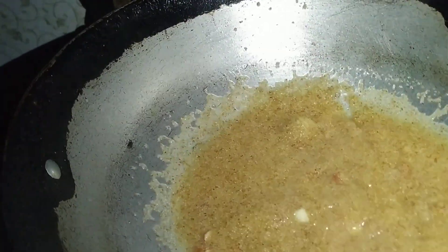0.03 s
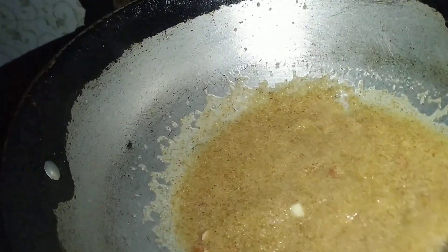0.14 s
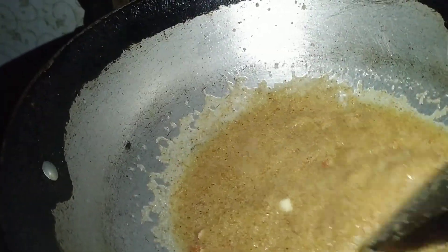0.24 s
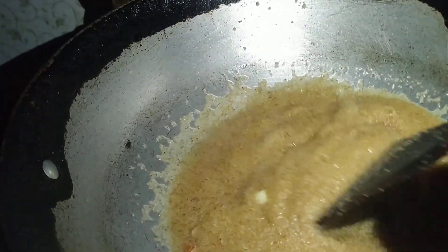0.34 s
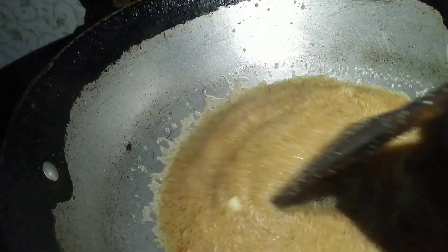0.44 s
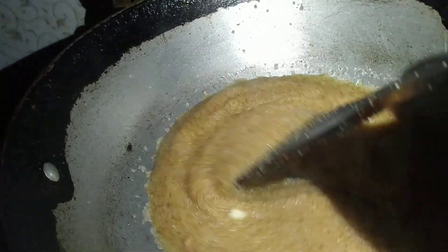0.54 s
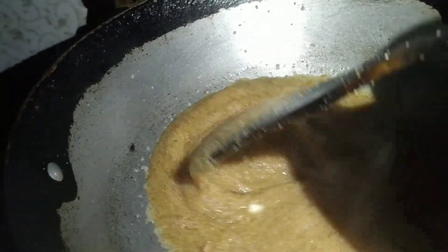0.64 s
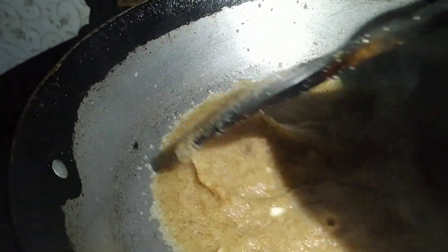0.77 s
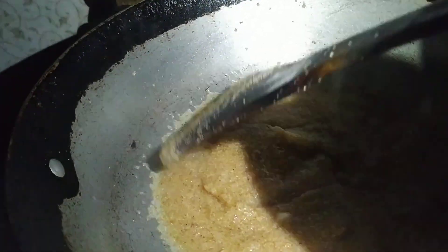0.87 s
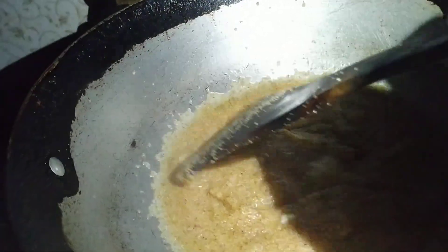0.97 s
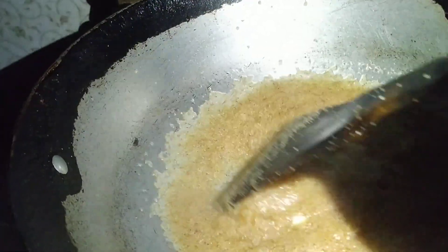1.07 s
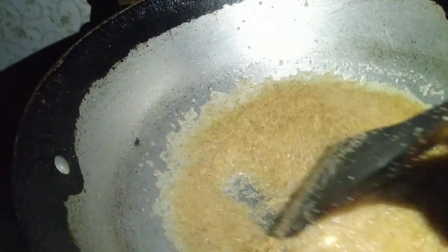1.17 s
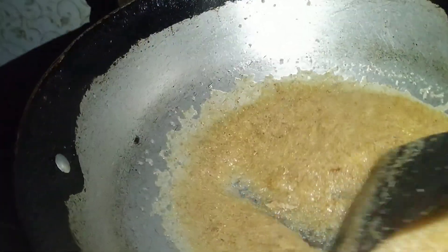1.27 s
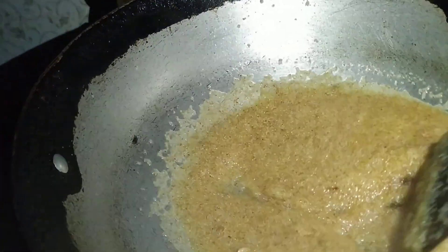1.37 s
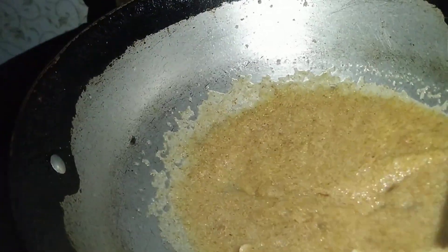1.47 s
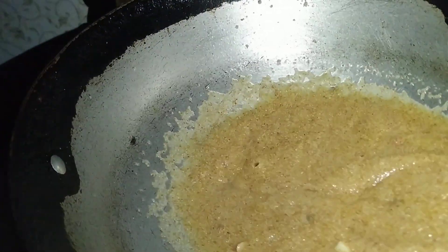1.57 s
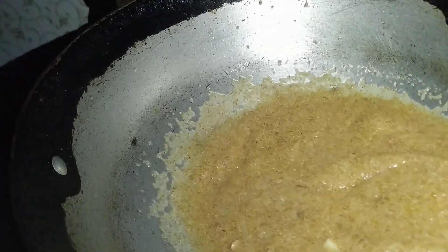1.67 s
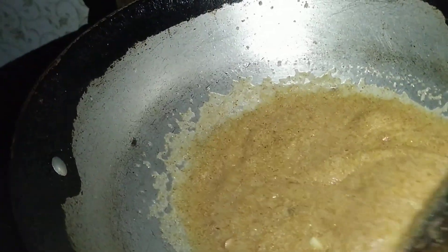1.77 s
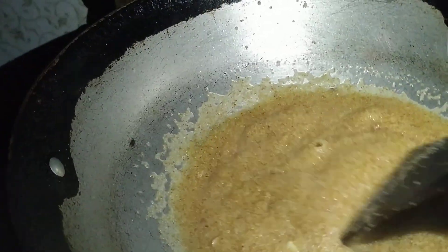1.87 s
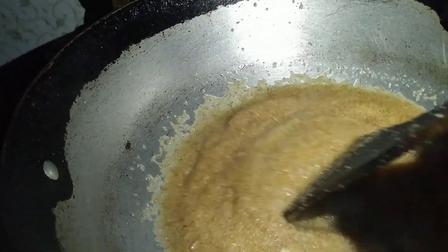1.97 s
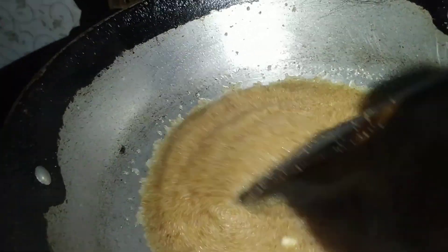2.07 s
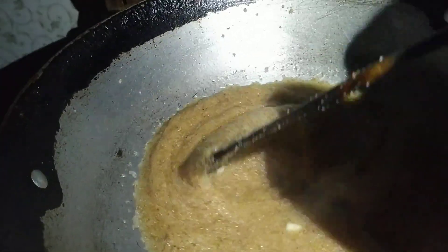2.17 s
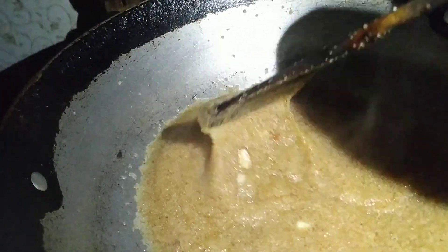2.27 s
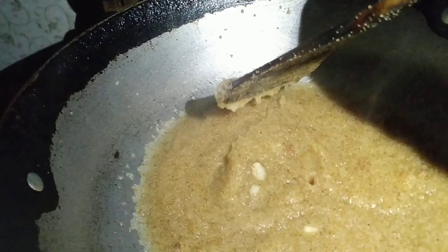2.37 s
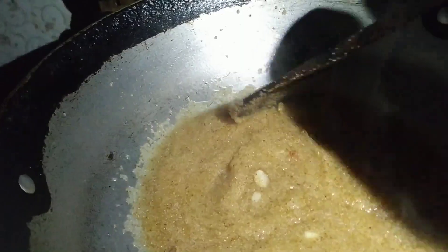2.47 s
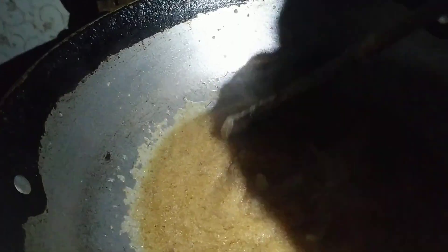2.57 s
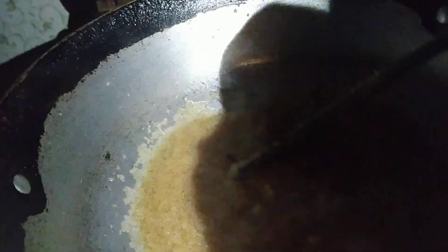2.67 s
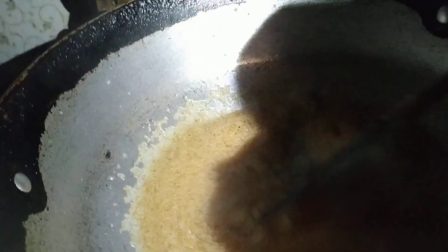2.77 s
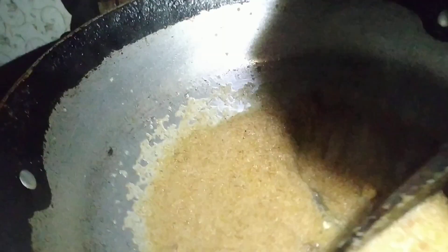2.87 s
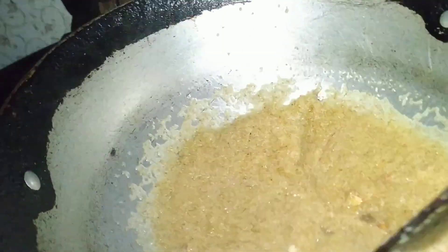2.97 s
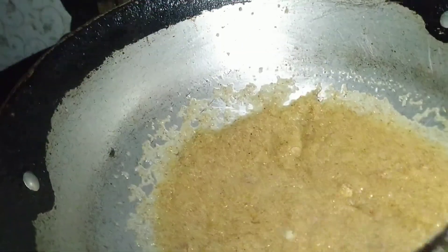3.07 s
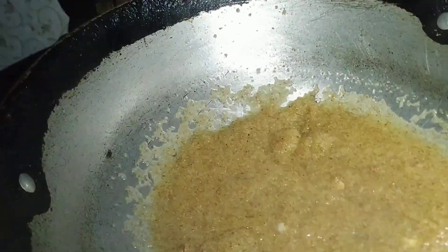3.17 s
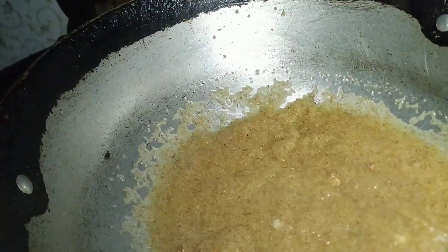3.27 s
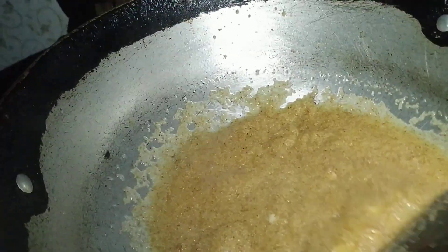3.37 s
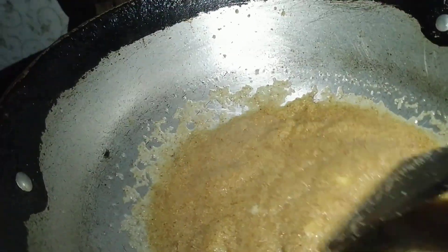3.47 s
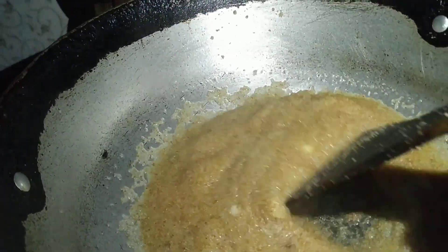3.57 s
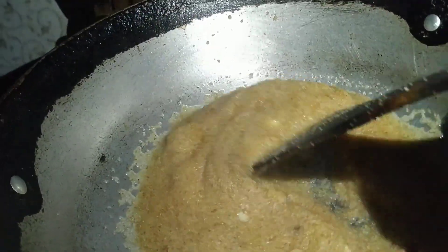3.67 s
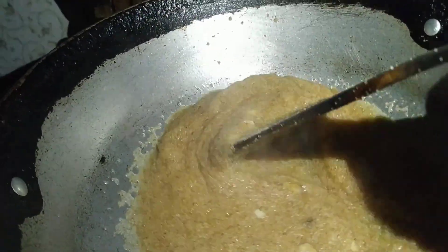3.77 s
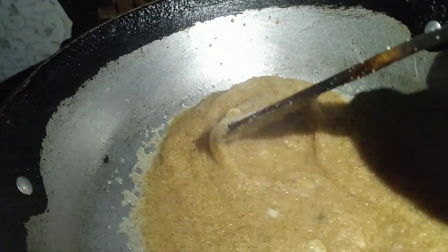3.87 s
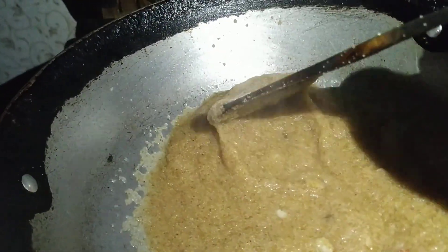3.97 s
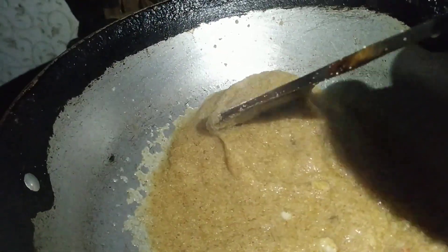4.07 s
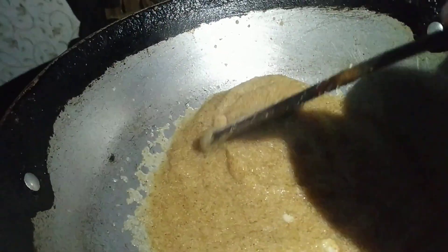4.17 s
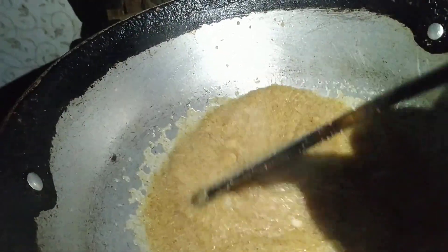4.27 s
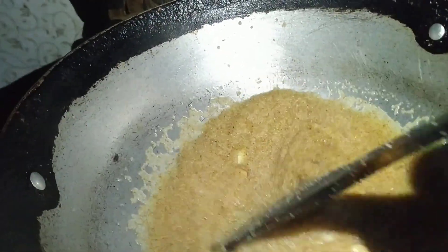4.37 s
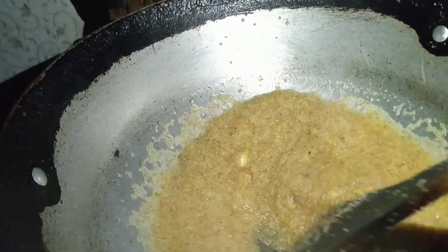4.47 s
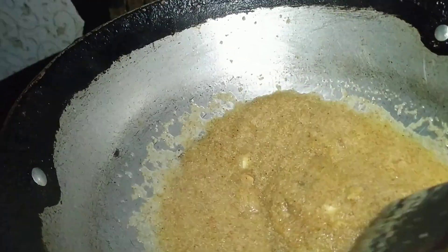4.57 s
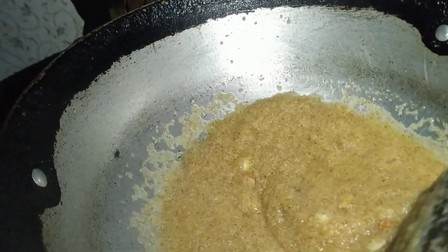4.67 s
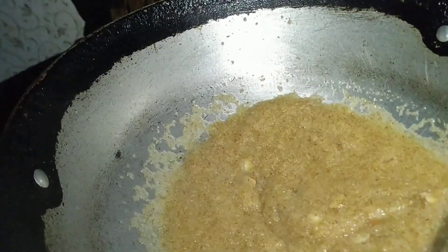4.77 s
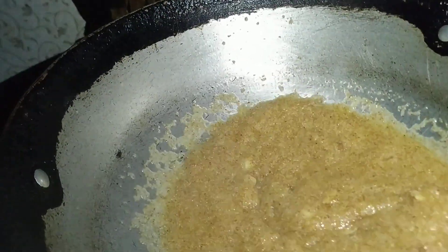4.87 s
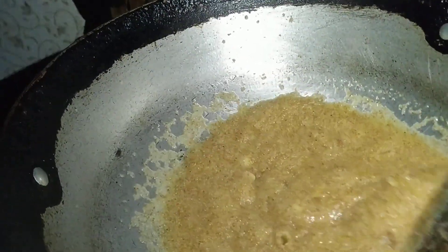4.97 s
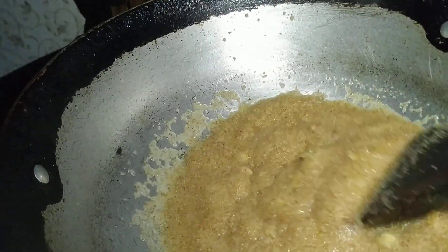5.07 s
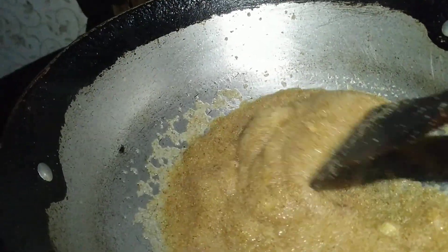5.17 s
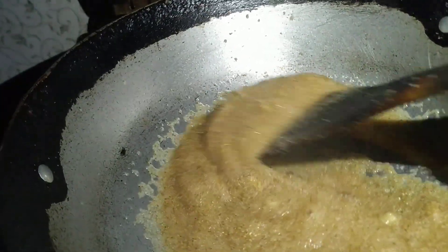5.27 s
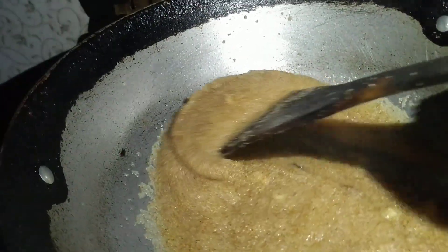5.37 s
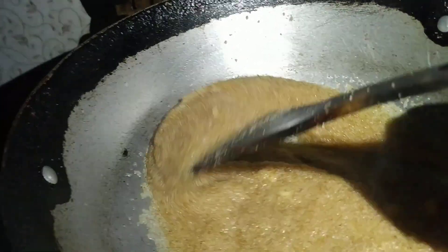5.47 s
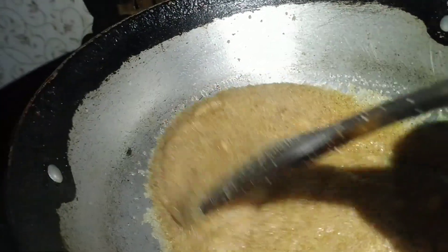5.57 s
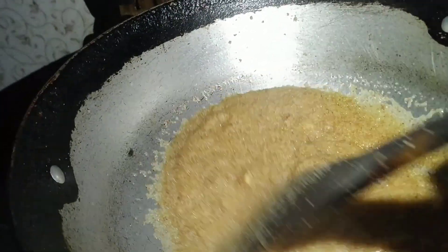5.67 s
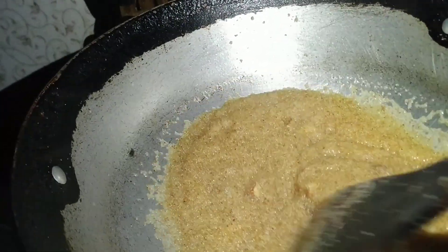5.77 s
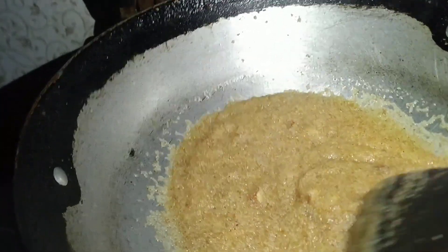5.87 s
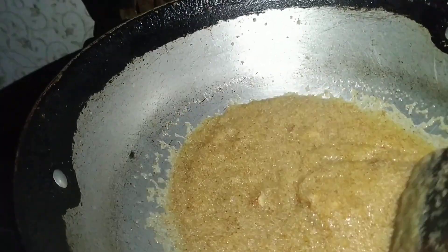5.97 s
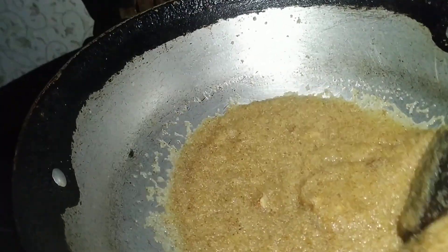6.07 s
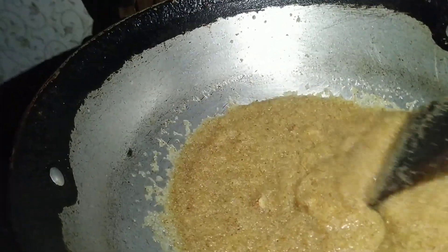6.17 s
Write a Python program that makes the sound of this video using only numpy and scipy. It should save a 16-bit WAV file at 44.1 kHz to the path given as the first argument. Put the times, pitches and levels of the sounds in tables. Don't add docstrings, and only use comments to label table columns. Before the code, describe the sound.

A metal spatula stirs thick, grainy pudding in a metal pan, landing with dull knocks and short gritty scrapes over low kitchen rumble.

```python
import sys
import numpy as np
from scipy import signal
from scipy.fft import rfft, irfft, next_fast_len
from scipy.io import wavfile
from scipy.ndimage import uniform_filter1d

SR = 44100
rng = np.random.default_rng(int(sys.argv[2]) if len(sys.argv) > 2 else 0)


def master_out(mix):
    frames = np.transpose(np.atleast_2d(mix))
    ceiling = np.clip(frames, -1, 1)
    pcm = np.round(ceiling * 32767).astype(np.int16)
    wavfile.write(sys.argv[1], SR, pcm)


def invert_db(x):
    u = np.asarray(x, float) / 20
    return 10 ** u


N = 274302
PAD = next_fast_len(N + SR // 2)
SPOTS = 7

# (frequency [Hz], correlation [0-1])
ALIKE = [(60, 0.85), (300, 0.94), (700, 0.89), (1100, 0.023), (1500, 0.0018), (15000, 0.0033)]
# (low edge [Hz], high edge [Hz])
RANGES = [
    (265, 450),
    (450, 1300),
    (1200, 2600),
    (3800, 16000),
    (480, 880),
]
# (time [s], peak [dB], hardness [dB], left-right [dB], easing just before [dB])
LANDINGS = [(0.186, -20, -39, 6, 84), (0.321, -14.5, -13.5, 2, -4), (0.629, -6.5, -16.5, 3.5, 5),
            (0.965, -26.5, -17, 15, 17), (1.073, -13, -20, 2, 19), (1.757, -15.5, -40, 2, 14),
            (1.89, -25, -6.5, 1, -7), (2.177, -3, -17.5, -1, 15), (2.564, -26, -15, 10, -5),
            (3.421, -26.5, -7, 5, 40), (3.57, -12.5, -17, 6, 28), (3.679, -22, -26, 7, 7),
            (3.811, -14, -37, 2, 29), (4.236, -35, -5, 2, -2), (5.025, -14.5, -34, 2, -3),
            (5.604, -23.5, -14, 1, -10), (6.137, -15.5, -40, -1, 17)]
# (time [s], peak [dB], hardness [dB], left-right [dB])
CHATTER = [(0.216, -15, -31, 0), (0.234, -27, -32, 13), (0.42, -20, -17.5, 4), (0.993, -7.5, -19.5, 5),
           (1.007, -8.5, -29, 6), (1.295, -29, -24, 1), (1.784, -34, -24, 5), (2.577, -22, -25, 8),
           (2.617, -13.5, -9.5, 7.5), (3.112, -37, -37, -4), (3.693, -17.5, -32, 1), (3.779, -22, -27, 5),
           (4.247, -13.5, -18, 7), (5.058, -22, -32, 11), (5.083, -16, -9.5, 0), (5.624, -17.5, -13.5, 9),
           (5.755, -20.5, -16.5, 2), (6.184, -11.5, -12.5, 1)]
# (time [s], peak [dB], hardness [dB], left-right [dB], skid [s])
NUDGES = [(0.1, -31, -21, 3, 0.0074), (0.505, -26.5, -15, 12, 0.057), (0.889, -24, -22, 11, 0.027),
          (1.668, -35, -33, 16, 0.014), (1.988, -18.5, -29, 11, 0.02), (2.074, -25.5, -16, 3, 0.061),
          (2.478, -22, -26, 5, 0.014), (2.912, -32, -38, -2, 0.019), (3.325, -30, -43, 2, 0.031),
          (4.149, -21.5, -26, 6, 0.015), (4.639, -32.5, -39, 2, 0.01), (4.944, -23.5, -25, 2, 0.022),
          (5.494, -26.5, -37, 7, 0.03), (6.034, -29, -38, -3, 0.03)]


def rms_one(x):
    return x / np.sqrt(np.mean(x ** 2) + 1e-20)


def in_time(rows):
    s, *columns = np.transpose(rows)
    return [np.interp(np.arange(N) / SR, s, c) for c in columns]


def at_hz(points, hz):
    return np.interp(np.log(hz), np.log(np.array(points)[:, 0]), np.array(points)[:, 1])


def drift(rate):
    r = np.exp(-80 * np.pi * rate / SR)
    slow = signal.lfilter([1], [1, -2 * r, r * r], rng.standard_normal(N // 40 + 4002))[4000:]
    return np.interp(np.arange(N) / 40, np.arange(len(slow)), rms_one(slow - slow.mean()))


def butter(x, order, hz, kind):
    return signal.sosfilt(signal.butter(order, hz, kind, fs=SR, output="sos"), x + 1e-18)


def band(x, low_hz, high_hz):
    return butter(x, 2, [low_hz, high_hz], "band")


def sides(pan_db):
    return invert_db(np.array([pan_db, -pan_db]) / 2)


def coloured(spectrum, balance):
    hz = np.arange(1, PAD // 2 + 2) * SR / PAD
    mid, side = rfft(rng.standard_normal((2, PAD)))
    alike = np.clip(at_hz(ALIKE, hz), 0, 1)
    pair = np.sqrt(1 + alike) * mid + np.sqrt(1 - alike) * side * [[1], [-1]]
    pair = pair * invert_db(at_hz(spectrum, hz)) * sides(at_hz(balance, hz))
    return rms_one(irfft(pair, PAD)[:, :N])


def electronics(left_db, right_db):
    # (frequency [Hz], density [dB per Hz])
    hiss_left = [(2000, -27), (7000, -14.5), (10000, -13.5), (13000, -7.5), (15500, -2.5)]
    hiss_right = [(2000, -4), (7000, -4.5), (10000, 1), (13000, 0.5), (15500, 0.5)]
    # (multiple, left [dB], right [dB])
    whine = [(63, -87, -99), (72, -84, -99), (99, -88, -99), (116, -88, -95), (125, -84, -93),
             (134, -88, -87), (143, -81, -85), (152, -86, -90), (170, -83, -88), (179, -81, -89),
             (188, -79, -94), (197, -80, -103), (206, -81, -96), (215, -88, -93), (233, -80, -92),
             (240, -84, -99), (241, -77, -95), (242, -77, -93), (250, -79, -95), (251, -73, -93),
             (256, -83, -99), (259, -81, -99), (260, -75, -99)]
    clock_hz = 59.9973
    hz = np.arange(1, PAD // 2 + 2) * SR / PAD
    shape = invert_db([at_hz(hiss_left, hz), at_hz(hiss_right, hz)])
    left, right = irfft(rfft(rng.standard_normal((2, PAD))) * shape, PAD)[:, :N]
    out = np.array([invert_db(left_db) * rms_one(left), invert_db(right_db) * rms_one(right)])
    for multiple, *db in whine:
        line = np.cos(2 * np.pi * clock_hz * multiple * np.arange(N) / SR)
        out += invert_db(np.array(db) + 3.5)[:, None] * line
    return out


def kitchen():
    # (frequency [Hz], density [dB per Hz])
    rumble = [(18, -18), (30, 19), (59, 4.5), (132, 13.5), (193, -8), (304, 5.5), (467, -5.5), (565, -52),
              (700, 3), (1030, -6.5), (1860, -14), (3380, -26), (5860, -22.5), (6600, -63), (9000, -57),
              (11700, -71), (19800, -120)]
    # (frequency [Hz], left-right [dB])
    rumble_balance = [(30, 2), (100, 1), (300, -0.5), (1200, 4), (8000, 5)]
    swell_db = 2 * drift(2.5)
    return invert_db(-52.5 + swell_db) * coloured(rumble, rumble_balance)


def lows(pressure):
    # (time [s], level [dB])
    sway_curve = [(0.0, -53), (1.84, -48), (1.92, -33), (2.03, -32), (2.11, -49), (2.25, -29), (2.32, -34),
                  (2.56, -39), (2.6, -41.5), (3.34, -56.5), (3.43, -47), (3.62, -58), (4.99, -51),
                  (5.16, -67), (5.39, -46.5), (6.22, -48)]
    rest_db, shaken_db = -53, -23
    sway = rms_one(band(band(rng.standard_normal(N + SR), 12, 24), 10, 26)[SR:])
    turns = np.cumsum(50.5 + 3.48 * drift(10.5)) / SR
    hum = np.sqrt(2) * np.sin(2 * np.pi * turns) * invert_db(4 * drift(25))
    hum_level = invert_db(rest_db) + invert_db(shaken_db) * uniform_filter1d(pressure, size=2000)
    return invert_db(in_time(sway_curve)[0]) * sway + hum_level * hum * sides(-2.4)[:, None]


def bumps(spring_hz, damping, pan_db):
    # (time [s], push [dB], push length [ms], click [dB])
    finger_bumps = [
        (2.5325, -12, 5.0, -40),
        (2.6175, -10, 2.4, -15),
        (2.6315, -16, 2.4, -29),
    ]
    push, click = np.zeros(N), np.zeros(N)
    click_fall_db = np.linspace(0, 69.0, 300)
    for s, db, ms, click_db in finger_bumps:
        i = round(s * SR)
        length = ms * SR / 1000
        n = np.arange(int(length) + 1)
        push[i:i + len(n)] -= invert_db(db) * np.sin(np.pi * n / length) ** 2
        click[i:i + 300] += invert_db(click_db - click_fall_db) * rng.standard_normal(300)
    spring = [1, 4 * np.pi * damping * spring_hz, (2 * np.pi * spring_hz) ** 2]
    b, a = signal.bilinear([1, 0, 0], spring, SR)
    return signal.lfilter(b, a, push + 1e-18) * sides(pan_db)[:, None] + band(click, 3700, 6050)


def pops(rise):
    # (time [s], peak [dB], pitch [Hz], length [cycles], left-right [dB])
    bubbles = [(.162, -46, 1300, 7.3, 3), (0.484, -31, 2440, 16, 2), (.839, -20, 1330, 7.8, 4),
               (0.852, -43, 3880, 7.7, 18), (1.525, -24.5, 1210, 5.6, -5), (1.597, -42.5, 2630, 14, -2),
               (1.741, -34, 1190, 13, 14), (2.93, -40.5, 1310, 8.3, -20), (2.941, -34, 1490, 9, -5),
               (3.396, -35, 1480, 8, 12), (4.093, -30, 1900, 5.6, 20), (4.106, -30.5, 4700, 13, 6),
               (4.811, -41, 2240, 8.2, 17), (4.929, -16.5, 1170, 8, 4.5), (4.951, -26, 3950, 6.1, 10),
               (5.335, -36.5, 2680, 5.2, 21), (5.352, -33, 2190, 5, 13), (5.375, -47, 2700, 18, 8)]
    out = np.zeros((2, N))
    for s, db, hz, cycles, pan_db in bubbles:
        turns = np.arange(600) / SR * hz
        fade = invert_db(db - 60 * turns / cycles) * np.minimum(turns, 1)
        pop = fade * np.sin(2 * np.pi * turns * (1 + rise * turns))
        for side, lag in enumerate((0, 12)):
            i = round(s * SR) + lag
            out[side, i:i + len(pop)] += sides(pan_db)[side] * pop
    return out


def damped_rings(rows, level_db, pan_db, lead):
    out, t = np.zeros((2, N + SR)), np.arange(SR // 5) / SR
    for s, db, hz, t60 in rows:
        i = round(s * SR)
        fade = invert_db(db + level_db - 60 * t / np.clip(t60, .01, .15)) * np.minimum(2 * hz * t, 1)
        out[:, i:i + len(t)] -= fade * np.sin(2 * np.pi * hz * t + [[lead], [0]])
    return out[:, :N] * sides(pan_db)[:, None]


def tinks():
    # (time [s], peak [dB], pitch [Hz], t60 [s])
    edge_tinks = [(0.189, -27, 1130, 0.03), (0.216, -32, 1200, 0.03), (0.263, -39, 1120, 0.03),
                  (0.3207, -19.5, 1115, 0.038), (0.3444, -20, 1000, 0.037), (0.4304, -39, 1110, 0.03),
                  (0.6275, -19, 1060, 0.037), (0.635, -15, 1070, 0.027), (0.6476, -13, 1120, 0.027),
                  (0.629, -21, 1720, 0.04), (0.632, -30, 1410, 0.061), (2.178, -15, 1410, 0.051),
                  (0.9693, -24, 1130, 0.03), (0.9924, -32, 990, 0.022), (1.0074, -12, 1220, 0.033),
                  (1.097, -17, 980, 0.033), (1.1147, -30, 1140, 0.026), (1.7564, -40, 1120, 0.03),
                  (1.783, -39, 1180, 0.03), (1.8914, -13.5, 1110, 0.036), (2.0742, -41, 1090, 0.03),
                  (2.1775, -28, 1010, 0.035), (2.184, -8, 1010, 0.026), (2.197, -22, 1060, 0.033),
                  (2.577, -38, 1030, 0.03), (2.5925, -25, 1330, 0.033), (2.6314, -14, 980, 0.028),
                  (2.6903, -40, 1010, 0.03), (3.4207, -26, 1100, 0.042), (3.4511, -41, 1120, 0.03),
                  (3.5708, -28, 1130, 0.023), (3.677, -40, 1100, 0.03), (3.783, -33, 1120, 0.03),
                  (3.809, -33, 1120, 0.03), (4.2353, -41, 1000, 0.03), (4.2474, -29, 1090, 0.027),
                  (4.2714, -22, 1090, 0.025), (4.3001, -16, 1100, 0.03), (4.364, -42, 1080, 0.03),
                  (5.026, -42, 1120, 0.025), (5.0614, -15, 1120, 0.05), (5.0816, -12.5, 1120, 0.05),
                  (5.109, -17, 1080, 0.033), (5.1444, -34, 1130, 0.03), (5.6034, -30, 990, 0.03),
                  (5.6334, -26, 1210, 0.027), (5.7644, -28, 1180, 0.03), (6.1345, -34, 1170, 0.03),
                  (6.1953, -20, 1100, 0.03)]
    return damped_rings(edge_tinks, level_db=-8.5, pan_db=2.2, lead=1.7)


def thuds():
    # (time [s], peak [dB], pitch [Hz], t60 [s])
    pan_patches = [(0.044, -40.5, 680, 0.082), (0.098, -31.5, 550, 0.053), (0.186, -32, 547, 0.091),
                   (0.215, -12.5, 552, 0.033), (0.233, -16.5, 581, 0.063), (0.264, -21, 358, 0.028),
                   (0.32, -21.5, 683, 0.034), (0.42, -27, 532, 0.069), (0.629, -10, 598, 0.038),
                   (0.645, -27.5, 294, 0.15), (0.889, -31.5, 810, 0.055), (0.976, -20.5, 564, 0.026),
                   (1.006, -15, 334, 0.063), (1.029, -21.5, 306, 0.13), (1.076, -20, 366, 0.023),
                   (1.097, -22, 370, 0.11), (1.129, -23, 780, 0.032), (1.294, -39, 600, 0.081),
                   (1.668, -31.5, 564, 0.13), (1.757, -28, 543, 0.057), (1.783, -21.5, 566, 0.12),
                   (1.89, -19, 676, 0.042), (1.914, -21, 415, 0.07), (1.987, -26, 550, 0.037),
                   (2.0, -31, 304, 0.17), (2.177, -6.5, 658, 0.024), (2.478, -37, 810, 0.036),
                   (2.616, -15.5, 464, 0.11), (2.796, -32, 650, 0.047), (2.912, -37, 310, 0.079),
                   (3.065, -45, 700, 0.065), (3.11, -36, 550, 0.067), (3.227, -35, 610, 0.043),
                   (3.287, -35.5, 693, 0.16), (3.328, -27, 548, 0.05), (3.42, -20.5, 556, 0.072),
                   (3.469, -26.5, 300, 0.15), (3.517, -28, 552, 0.054), (3.568, -31, 537, 0.057),
                   (3.692, -20.5, 556, 0.096), (3.809, -11.5, 670, 0.026), (4.148, -35, 794, 0.1),
                   (4.258, -21.5, 830, 0.062), (4.64, -38, 680, 0.043), (4.945, -26, 534, 0.055),
                   (5.065, -22.5, 338, 0.091), (5.495, -36, 380, 0.08), (5.628, -21, 377, 0.033),
                   (5.708, -25, 320, 0.052), (6.035, -30, 540, 0.089), (6.113, -34, 543, 0.041),
                   (6.165, -16.5, 351, 0.08), (6.183, -17.5, 544, 0.097)]
    return damped_rings(pan_patches, level_db=-2.5, pan_db=-1.0, lead=0.29)


def pan_rings(weak_db, spot_db, damped, damped_db):
    # (frequency [Hz], level [dB], t60 [s])
    strong_modes = [(331.8, 6.5, 0.21), (305.2, 3, 0.2), (392.2, 17.5, 0.6), (423, 15.5, 0.41),
                    (517, 12.5, 0.069), (551.8, 4.5, 0.23), (565.5, 1, 0.073), (680, 6.5, 0.016),
                    (670, 8.5, 0.043), (767, 4, 0.18), (860, 5, 0.13), (800, 2.5, 0.089),
                    (933.5, 7.5, 0.11), (1410, -6, 0.096), (1112.6, 9, 0.078), (1490, -13, 0.07),
                    (1720, -15, 0.058), (1896, -10.5, 0.07), (2505, -0.5, 0.052)]
    # (frequency [Hz], density [dB per Hz])
    weak_colour = [(200, 12), (250, -71), (289, -58), (400, -23), (460, -12), (541, -3), (898, -31),
                   (1050, -50), (1130, -0.5), (1240, -22), (1400, -13.5), (1650, -11), (1950, -10),
                   (2300, -9), (3000, -15.5), (3500, -18.5), (4200, -16.5), (5000, -18), (5800, -18.5),
                   (6580, -23), (9000, -27), (13000, -30)]
    # (frequency [Hz], t60 [s])
    weak_decay = [(150, 0.17), (600, 0.12), (1600, 0.18), (3000, 0.1), (5000, 0.061), (12000, 0.014)]
    # (frequency [Hz], phase [radians])
    left_lead = [(300, .05), (800, .4), (1100, 1.3), (1450, 3.0), (15000, 3.0)]
    longest_ring_s, detune = .16, .012
    crowded_hz, crowded_spread_db = 1250, 2.5
    strong_hz, strong_db, strong_t60 = np.transpose(strong_modes)

    weak_hz = np.geomspace(200, 14000, 420) * (1 + .004 * rng.standard_normal(420))
    wet = np.arange(420) % 2
    weak_t60 = (at_hz(weak_decay, weak_hz) * np.where(wet, damped, 1)).clip(.005, 1)
    weak = at_hz(weak_colour, weak_hz) + weak_db + damped_db * wet
    weak = weak + 10 * np.log10(weak_hz / 600 / weak_t60 / 10)

    hz = np.r_[strong_hz, weak_hz]
    t60 = np.r_[strong_t60.clip(.02, longest_ring_s), weak_t60]
    spread_db = np.where(hz < crowded_hz, spot_db, crowded_spread_db)
    spots = invert_db(spread_db * rng.standard_normal((SPOTS, 1, len(hz))))
    strength = invert_db(np.r_[strong_db, weak]) * spots / np.sqrt(np.mean(spots ** 2, axis=0))
    spread = np.sqrt(-np.log(np.clip(at_hz(ALIKE, hz), 1e-3, 1)))
    skew = 1.76 * spread * rng.standard_normal((SPOTS, 2, len(hz)))
    skew = skew + np.where(hz < crowded_hz, .9, 3) * rng.standard_normal((SPOTS, 1, len(hz)))
    skew[:, 0] += at_hz(left_lead, hz)
    n = np.arange(SR // 4)
    rings = np.exp(np.outer(2j * np.pi * hz - np.log(1000) / t60, n / SR))
    rings = ((strength * np.exp(1j * skew)) @ rings).imag
    tuning = np.linspace(1 - detune, 1 + detune, SPOTS)
    return np.array([[np.interp(n * q, n, side) for side in pair] for q, pair in zip(tuning, rings)])


def split(x):
    signs, orders = (1, 1, -1, 1, 1), (2, 2, 1, 1, 2)
    return [sign * butter(x, order, part, "band") for sign, order, part in zip(signs, orders, RANGES)]


def glide(slips, width_hz):
    # (time [s], pitch [Hz])
    swish_pitch = [(0, 600), (.17, 680), (.8, 640), (1.35, 527), (1.5, 662), (1.65, 717), (2.3, 680),
                   (2.45, 774), (2.95, 600), (3.1, 695), (3.3, 715), (4.0, 607), (4.5, 700), (4.7, 584),
                   (4.9, 710), (5.4, 695), (5.9, 675), (6.1, 740)]
    carrier = np.exp(2j * np.pi * np.cumsum(in_time(swish_pitch)[0]) / SR)
    slow = butter(slips * carrier.conj(), 2, width_hz / 2, "low")
    return rms_one((slow * carrier).real)


def stroke(length, db, boom_db, grit_db):
    catch_s, catch_db, swell_s = 0.00057, -10.5, 0.37 * length
    sag_db, let_go_db_per_s = -5, 228
    t = np.arange(SR * 3 // 4) / SR
    times = [0, catch_s, catch_s + swell_s, catch_s + length, length + 1]
    db = db + np.interp(t, times, [-40, catch_db, 0, sag_db, sag_db - let_go_db_per_s])
    boom = boom_db + 7 * np.clip(1 - t / 0.014, 0, 1)
    bite = -5 + 0.79 * grit_db - 54 * t
    grit = grit_db - 90 * t + 4.5 * np.clip(1 - t / swell_s, 0, 1)
    return invert_db(db + np.array([boom, 0 * t, bite, grit]))


def contact(lift_s):
    # (time [s], length [s], pressure [dB], weight on the floor [dB], grit [dB])
    edge_strokes = [(0.188, 0.083, -32.5, 12, -14), (0.307, 0.054, -34.5, 11.5, -20.5),
                    (0.417, 0.027, -34, 11.5, -24), (0.632, 0.019, -25.5, 5, -23.5),
                    (0.97, 0.089, -31, 12.5, -6), (1.066, 0.085, -30.5, 9, -16),
                    (1.756, 0.066, -33, 14.5, -14.5), (1.881, 0.05, -33.5, 13, -26),
                    (2.164, 0.032, -25, 5.5, -24.5), (2.565, 0.079, -27, 7.5, -16.5),
                    (2.645, 0.11, -35, 9.5, -16.5), (3.414, 0.064, -30.5, 13, -19.5),
                    (3.554, 0.042, -29.5, 13, -20.5), (3.666, 0.04, -40.5, 14.5, -21),
                    (3.779, 0.025, -34.5, -1, -20), (3.811, 0.028, -28.5, 8.5, -24.5),
                    (4.236, 0.079, -25.5, 10, -17.5), (4.34, 0.021, -30.5, 9.5, -20),
                    (5.027, 0.14, -32, 12, -16.5), (5.052, 0.12, -30, -2, -14.5),
                    (5.603, 0.023, -35, 14, -17), (5.623, 0.022, -27.5, 8.5, -21),
                    (5.68, 0.11, -39, 15.5, -23), (6.13, 0.13, -29.5, 13.5, -18.5)]
    # (time [s], length [s], pressure [dB])
    crust_brushes = [
        (0.848, 0.007, -63),
        (1.525, 0.022, -70),
        (1.82, 0.19, -63.5),
        (1.093, 0.042, -58),
        (2.585, 0.045, -64),
        (4.093, 0.021, -63),
        (4.95, 0.011, -67),
        (5.335, 0.075, -81),
    ]
    # (time [s], effort [dB])
    plough_effort = [(0, -50.5), (.15, -52), (.5, -55), (.8, -54), (1.25, -83), (1.42, -58.5), (1.65, -49),
                     (2.35, -48), (2.82, -63), (3.0, -70), (3.08, -51.5), (3.3, -51.5), (3.95, -53),
                     (4.55, -66), (4.88, -50), (5.35, -56.5), (5.95, -55.5), (6.22, -44)]
    plough_colour = [7, -4, -31.5, -11.5, -3]
    skid_db, skid_boom_db, skid_grit_db = -16.5, 2, -28
    brush_boom_db, brush_grit_db = -15, 14.5
    lift_hush_db = 12

    skids = [(s, skid_s, db + skid_db, skid_boom_db, skid_grit_db) for s, db, *_, skid_s in NUDGES]
    brushes = [(*row, brush_boom_db, brush_grit_db) for row in crust_brushes]
    energy = invert_db(2 * (in_time(plough_effort)[0] + np.array(plough_colour)[:, None]))
    knocks = np.array([row[0] for row in LANDINGS + CHATTER + NUDGES])
    for s, *shape in edge_strokes + skids + brushes:
        nearest = knocks[np.argmin(abs(knocks - s))]
        i = round((nearest if abs(nearest - s) < .02 else s) * SR)
        force = stroke(*shape)[:, :N - i]
        energy[:4, i:i + force.shape[1]] += force ** 2
    before = np.arange(2000, 0, -1) / SR
    easings = [(row[0], row[-1]) for row in LANDINGS] + [(row[0], lift_hush_db) for row in NUDGES]
    for s, easing_db in easings:
        i = round(s * SR)
        energy[:, i - len(before):i] *= invert_db(-2 * max(easing_db, 0) * np.exp(-before / lift_s))
    return np.sqrt(energy)


def spatula(pressure, slips_per_s, slip_spread_db, clump_db, knock_db):
    range_db = [-13.0, 0.5, 4.5, -3.5, -5.0]
    thin_hz = 470
    soft_hz = 1900
    tap_boom_db, tap_grit_db, grit_follows_hardness = -11.5, 13.5, 3.5

    rings = pan_rings(weak_db=-3.5, spot_db=7.0, damped=.22, damped_db=-3)
    rings = np.array([rms_one(spot) for spot in rings])
    ring_gain = [1 / np.sqrt(np.mean(np.sum(band(rings, *part) ** 2, axis=-1))) for part in RANGES]

    sizes = invert_db(slip_spread_db * np.minimum(rng.exponential(1, N), 3)) * rng.choice([-1, 1], N)
    slipping = rng.random(N) < slips_per_s / SR
    slips = rms_one(sizes * slipping * invert_db(clump_db * drift(49.0)))
    parts = split(slips)
    parts[-1] = np.std(parts[-1]) * glide(slips, width_hz=240.0) * invert_db(3.0 * drift(8.7))
    drag = sum(g * invert_db(db) * p * part for g, db, p, part in zip(ring_gain, range_db, pressure, parts))
    share = invert_db(6 * np.array([drift(6) for _ in range(SPOTS)]))
    share = share / np.sqrt(np.sum(share ** 2, axis=0))
    force = np.repeat((drag * share)[:, None], 2, axis=1)

    impulse = -np.eye(1, 1000)[0]
    taps = np.array(ring_gain)[:, None] * split(impulse)
    taps = butter(taps[:-1], 2, thin_hz, "high")
    taps[:2] = butter(taps[:2], 2, soft_hz, "low")
    for k, (s, db, hard, pan_db, *_) in enumerate(sorted(LANDINGS + CHATTER + NUDGES)):
        grit = tap_grit_db + grit_follows_hardness * hard
        tap = invert_db(db + knock_db + np.array([tap_boom_db, 0, hard + 3.45, grit])) @ taps
        i = round(s * SR)
        force[k % SPOTS, :, i:i + len(tap)] += sides(pan_db)[:, None] * tap[:N - i]
    return irfft(np.sum(rfft(force, PAD) * rfft(rings, PAD), axis=0), PAD)[:, :N]


def scene():
    pressure = contact(lift_s=0.0036)
    pan = spatula(pressure, slips_per_s=1500, slip_spread_db=3, clump_db=1.5, knock_db=11.5)
    pan = pan + thuds() + tinks()
    hand = bumps(spring_hz=46.0, damping=0.33, pan_db=-6.0) + lows(pressure[1])
    return pan + pops(rise=0.013) + hand + kitchen()


def flickering(x):
    from_hz, depth_db, lift_db = 2300, -26, 1.4
    slot, hold, rarity = 3, 11, 0.7
    hz, _, cells = signal.stft(x, SR, nperseg=1024)
    chance = uniform_filter1d(rng.standard_normal(cells.shape[1:]), size=slot, axis=0)
    chance = rms_one(uniform_filter1d(chance, size=hold, axis=1))
    shut = np.clip(2 * (chance - rarity), 0, 1)
    gain_db = (lift_db + depth_db * shut) * (hz > from_hz)[:, None]
    return signal.istft(cells * invert_db(gain_db), SR, nperseg=1024)[1][:, :N]


def low_pass(x):
    return signal.sosfilt(signal.butter(12, 15830, fs=SR, output="sos"), x)


def record(dry):
    x = dry + electronics(left_db=-55.0, right_db=-60.5)
    x = signal.sosfilt(signal.cheby2(16, 45, 16000, fs=SR, output="sos"), x)
    return low_pass(flickering(x))


dry = scene()
out = record(dry)
master_out(out)
```